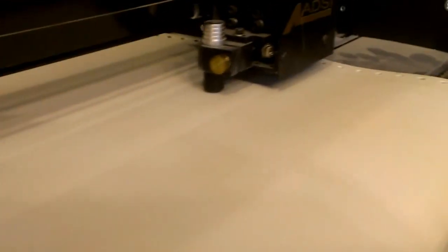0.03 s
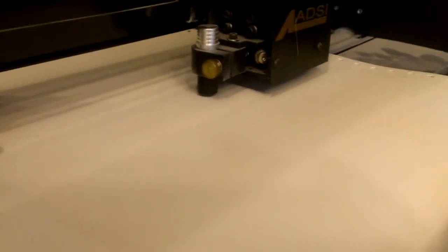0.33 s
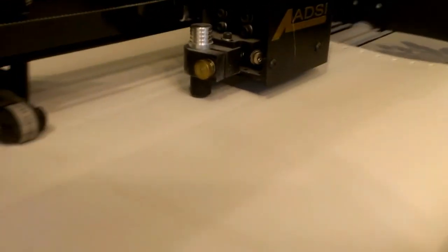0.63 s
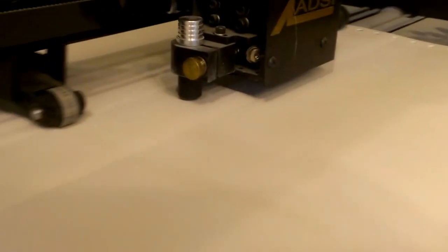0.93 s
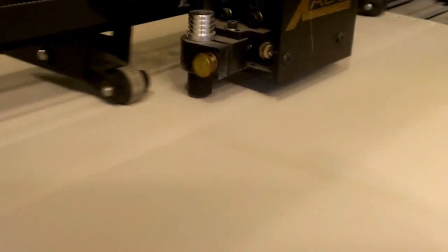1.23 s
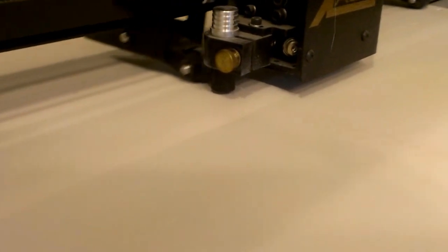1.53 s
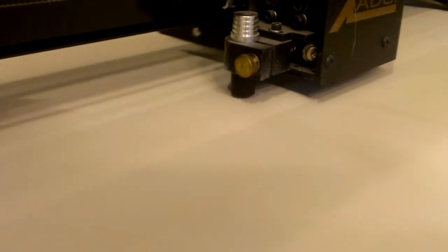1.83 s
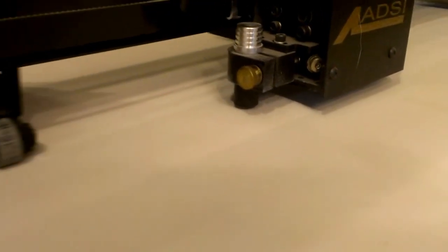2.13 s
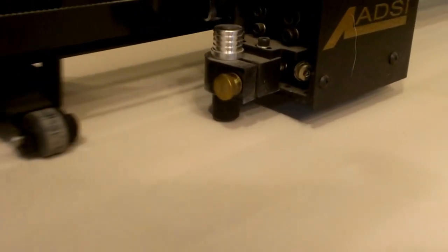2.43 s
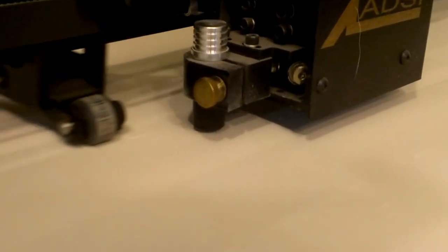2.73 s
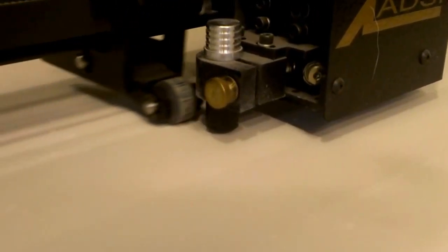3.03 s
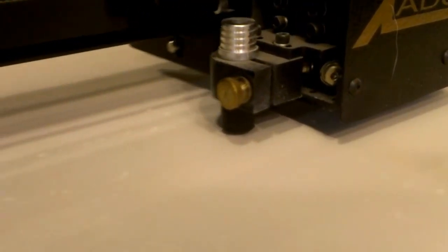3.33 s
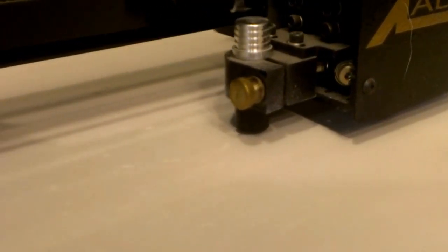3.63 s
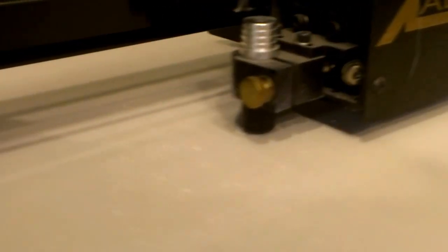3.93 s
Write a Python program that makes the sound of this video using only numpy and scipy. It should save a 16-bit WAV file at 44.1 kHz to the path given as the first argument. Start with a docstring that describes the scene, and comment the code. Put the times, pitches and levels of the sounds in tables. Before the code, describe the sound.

A cutting plotter's motor whirs with high, metallic gear chatter while its blade rasps faintly over a sheet. Rollers knock and grow louder above a low table rumble, until the drive stops with a click, heard close up.

```python
"""Gear teeth chatter in a ringing metal housing as a flatbed cutting plotter drives its gantry closer.
Two thin whines ride on the chatter, and the blade rasps over the sheet in a stream of tiny impacts.
Underneath, table and frame drone, the drive hums in short swells, and rollers knock and sing ever louder.
Near the end the drive brakes with a hum, the head clicks, and a sideways stroke starts with a thin hiss."""
import sys
import numpy as np
from scipy import signal
from scipy.fft import rfft, irfft
from scipy.io import wavfile
from scipy.ndimage import uniform_filter1d, map_coordinates

SR = 44100
rng = np.random.default_rng(int(sys.argv[2]) if len(sys.argv) > 2 else 0)


def inscribe(sig):
    """Save sig as 16-bit PCM at rate SR to the path in sys.argv[1].

    A 1-D sig is mono; a 2-D sig holds one channel per row.
    Samples are clipped to [-1, 1] before scaling.
    """
    pcm = np.round(np.clip(np.atleast_2d(sig).T, -1, 1) * 32767)
    wavfile.write(sys.argv[1], SR, pcm.astype(np.int16))


N = 176400

# tone colour of the table's rumble: f/Hz, relative level/dB
RUMBLE_EQ = [(25, -19), (60, -16.5), (100, -33), (135, -5.5), (200, 3.5), (290, 6.5), (330, -12),
             (420, 2.5), (600, -4), (800, -7), (1080, -14), (1500, -17.5), (2000, -14.5), (2800, -16.5),
             (5000, -39.5)]
# frame resonances: f/Hz, width/Hz, opening level/dB, closing level/dB
FRAME_MODES = [(145.4, 10.4, -58, -39.5), (162.2, 16, -49, -46.5), (245.9, 17, -42, -40.5),
               (261, 18, -40.5, -56.5), (362, 20, -52, -43), (770.7, 8.6, -53, -57.5),
               (822.2, 7, -51.5, -58)]
# the drive hums under load: centre t/s, length/s, f/Hz, level/dB
HUM_SWELLS = [(.015, 0.043, 237, -23), (0.088, 0.05, 249, -26), (0.145, 0.041, 243, -29.5),
              (0.459, 0.099, 257.6, -32), (0.544, 0.036, 255, -26.5), (1.078, 0.09, 266, -29),
              (1.469, 0.14, 251, -32), (2.161, 0.18, 248, -34.5), (3.853, 0.062, 261, -25),
              (3.905, 0.1, 249, -21.5), (3.947, 0.059, 267, -26.5), (3.981, 0.034, 253, -27)]
# roller resonances: f/Hz, width/Hz, base level/dB, pan L-R/dB, multiplier on the ride and surges
ROLLER_MODES = [(747, 90, -44.5, 9, 2.2), (1226, 14, -39.5, 0.5, 1.74), (1309, 44.5, -40.5, 3, 0.97),
                (1368, 52, -41.5, 5, 1.82), (1470, 200, -53, 12, 0.68)]
# level ride of the approaching rollers: t/s, gain/dB
ROLLER_RIDE = [(0, -9.5), (1.6, -10.5), (2, -8.5), (2.6, -7.5), (3.05, -3.5), (3.5, -5), (3.8, -3),
               (4, -9.5)]
# the rollers bind and surge: centre t/s, boost/dB
ROLLER_BINDS = [(2.03, 3), (2.42, 4), (2.93, 3), (3.09, 2.5), (3.31, 3), (3.44, 3), (3.84, 3)]
# rollers knock on the track: t/s, f/Hz, level/dB
TRACK_KNOCKS = [(.737, 370, -28), (.921, 420, -31), (1.823, 466, -26.5), (1.914, 259, -26),
                (2.023, 437, -39), (2.094, 255, -34), (2.647, 263, -27.5), (3.25, 252, -25.5),
                (3.721, 404, -27.5)]
# tone colour of the sideways hiss: f/Hz, relative level/dB
SIDEWAYS_EQ = [(300, 1), (600, 1), (900, 16), (1150, 1), (1350, 1), (2000, -2), (4500, 2.5), (5600, 0),
               (7000, 9.5), (7700, 6), (8600, 10.5), (10500, -2.5), (16000, -11)]
# the head's click and its rebound: t/s, gain/dB
HEAD_CLICKS = [(3.8663, -21.5), (3.871, -27.5)]
# head resonances: f/Hz, t60/s, relative level/dB
HEAD_MODES = [(3080, 0.12, -3.5), (4500, 0.13, -2), (6960, 0.05, -2), (7700, 0.061, 1)]
# tone colour of the blade on the sheet: f/Hz, relative level/dB
RASP_EQ = [(2500, -10), (5000, -1), (8000, 10.5), (10000, 5.5), (12500, -11.5), (16000, -24)]
# tone colour of the faint high hiss above the rasp: f/Hz, relative level/dB
HIGH_HISS_EQ = [(5000, -25), (9000, -15), (12000, 2), (15500, -9)]
# the blade catches: centre t/s, length/s, boost/dB
BLADE_CATCHES = [(0.222, 0.4, 3.5), (.41, 0.065, 8), (0.602, 0.2, 7.5), (.75, 0.12, 6.5), (3.785, 0.094, 4)]
# glide of the lower gear whine: t/s, f/Hz
LOW_WHINE_GLIDE = [(0, 4590), (2.15, 4560), (2.75, 4650), (3.5, 4520), (3.8, 4580)]
# glide of the upper gear whine: t/s, f/Hz
HIGH_WHINE_GLIDE = [(0, 6800), (1, 6560), (1.7, 6700), (3.2, 6760), (3.8, 6650)]
# level ride of the lower whine: t/s, level/dB
LOW_WHINE_RIDE = [(0, -37), (.35, -27.5), (.8, -34.5), (1.4, -31), (2.8, -30), (3.05, -40), (3.45, -32),
                  (3.8, -37)]
# level ride of the upper whine: t/s, level/dB
HIGH_WHINE_RIDE = [(0, -52), (.75, -36), (1.45, -50), (1.88, -38), (2.28, -35.5), (2.48, -53), (2.95, -33),
                   (3.15, -41), (3.35, -37.5), (3.8, -55)]
# the gear cover rings louder as it nears: t/s, level/dB
COVER_RIDE = [(0, -48), (1.5, -49), (3.8, -34.5)]
# one hard clack of the teeth: t/s, added load relative to the steady chatter/dB
TOOTH_CLACKS = [(1.193, 1)]
# ring of the gear housing: f/Hz, relative level/dB
HOUSING_EQ = [(1500, -44.5), (2800, -55), (2950, -22.5), (3350, -21.5), (3490, -36), (3590, -14),
              (3900, -7.5), (4230, -9), (4420, -1), (4570, 0.5), (4740, -1), (4900, -9), (5230, -19),
              (5700, -20.5), (6030, -10.5), (6400, -13.5), (6720, -9), (6920, -19), (7270, -17),
              (8300, -25.5), (9200, -33.5), (9580, -20), (10300, -62), (11000, -27), (12500, -51),
              (16000, -69)]
# the housing's ring leans left in the top end: f/Hz, pan L-R/dB
HOUSING_BALANCE = [(3000, 2), (3900, 2), (4550, -5), (5400, -3), (5950, 4.5), (6700, 9.5), (7600, 5.5),
                   (9600, 5.5), (15000, 14)]
# level ride of the housing's ring: t/s, gain/dB
HOUSING_RIDE = [(0, -1), (2.6, -0.14), (3.8, -0.5)]
# stereo drift of the housing's ring and the lower whine: t/s, pan L-R/dB
GEAR_PAN = [(0, .5), (.8, 1.2), (1.6, 2), (2.25, 3.5), (2.7, 1.8), (3.4, 0), (3.8, 2)]

START_S, RUN_UP_S, BRAKE_S, STOP_S = -0.029, 0.072, 3.815, 3.882  # the gantry's stroke
RUMBLE_START_DB, RUMBLE_RISE_DB = -40.58, 1.04
KNOCK_ATTACK_S, KNOCK_T60_S, CLICK_ATTACK_S = 0.011, 0.14, 0.002
SIDEWAYS_START_S, SIDEWAYS_ATTACK_S, SIDEWAYS_DB = 3.85, 0.13, -33.5
BLADE_BASE_DB, BLADE_RISE_DB, HISS_OFFSET_DB = -45.5, 4, -10
SHAFT_HZ, BIND_DEPTH, BIND_DECAY_TURNS, HOUSING_BASE_DB = 21.57, 0.3, 0.65, -25.5
HIGH_CUT_HZ = 15750
TIME = np.arange(N) / SR
PROGRESS = np.arange(N) / N


def undb(db):
    """Decibels to gain."""
    return 10 ** (np.asarray(db) / 20)


def unit(x):
    """Scale to an rms of one."""
    return x / np.sqrt(np.mean(x ** 2))


def curve(rows):
    """An automation line through (t/s, value) rows."""
    return np.interp(TIME, *np.array(rows).T)


def swell(at, length):
    """A smooth rise and fall around a moment."""
    return np.cos(np.pi * np.clip((TIME - at) / length, -.5, .5)) ** 2


def decay(at, t60):
    """A hard attack and an exponential tail."""
    age = TIME - at
    return (age >= 0) * undb(-60 * np.maximum(age, 0) / t60)


def drift(rate):
    """Smooth random modulation at unit rms, with about `rate` new values a second."""
    hold = int(SR / rate)
    steps = rng.standard_normal(N)[np.arange(N) // hold]
    return unit(uniform_filter1d(uniform_filter1d(steps, hold), hold))


def by_hz(rows):
    """Read (f/Hz, value) rows at every FFT bin, on a log frequency scale."""
    hz, value = np.array(rows).T
    return np.interp(np.log(np.arange(N // 2 + 1) * SR / N + 1), np.log(hz), value)


def body(x, eq):
    """Ring a body with the given tone colour: a minimum-phase filter, output at unit rms."""
    cepstrum = irfft(np.log(undb(by_hz(eq))), N)
    cepstrum[1:N // 2] *= 2
    cepstrum[N // 2 + 1:] = 0
    return unit(irfft(rfft(x) * np.exp(rfft(cepstrum)), N))


def resonate(x, hz, width):
    """A resonance with steep skirts, output at unit rms."""
    f = np.arange(N // 2 + 1) * SR / N + 1e-3
    return unit(irfft(rfft(x) / (1 + .5j * hz / width * (f / hz - hz / f)) ** 2, N))


def pan(db):
    """Left and right gains for an L-R level difference."""
    return undb(np.array([db, -db]).reshape(2, -1) / 2)


def spread(pair, side):
    """Turn a mid/side pair into left and right."""
    return pair[0] + side * pair[1] * np.array([[1], [-1]])


def noise(side):
    """Stereo noise of a given width."""
    return spread(rng.standard_normal((2, N)), side)


def ticks(rate, scatter_db, side):
    """A stereo stream of tiny impacts of uneven strength, `rate` a second in both mid and side."""
    strength = undb(scatter_db * np.clip(rng.standard_normal((2, N)), -2, 2))
    hits = rng.random((2, N)) < rate / SR
    polarity = np.sign(rng.standard_normal((2, N)))
    return spread(unit(hits * strength * polarity), side)


def beam(x):
    """The metal beam adds a short dense ring, different on each side."""
    tail = rng.standard_normal((2, N)) * decay(0, t60=0.078)
    tail /= np.sqrt(np.sum(tail ** 2, axis=1, keepdims=True))
    return unit(x + undb(-0.5) * irfft(rfft(x) * rfft(tail), N))


def gantry_speed():
    """The gantry runs up, cruises at one and brakes to zero."""
    run_up = np.clip((TIME - START_S) / RUN_UP_S, 0, 1)
    return run_up * np.clip((STOP_S - TIME) / (STOP_S - BRAKE_S), 0, 1)


def frame_drone():
    """The low bed: the gantry shakes table and frame, and their balance shifts along the way."""
    shake = rng.standard_normal((2, N))
    side_eq = [(60, 4), (150, -3), (300, -13), (600, -5.5), (1500, -3.5)]  # f/Hz, gain/dB
    shake[1] = irfft(rfft(shake[1]) * undb(by_hz(side_eq)), N)
    out = body(spread(shake, side=0.7), RUMBLE_EQ) * undb(RUMBLE_START_DB + RUMBLE_RISE_DB * PROGRESS)
    for hz, width, first_db, last_db in FRAME_MODES:
        mode = resonate(noise(side=min(hz / 1800, 1)), hz, width)
        out += mode * undb(first_db + (last_db - first_db) * PROGRESS)
    return out


def drive_hum():
    """The loaded drive gives short swells of low, slightly unsteady hum."""
    wobble = .3 * drift(50)
    out = np.zeros(N)
    for at, length, hz, db in HUM_SWELLS:
        tone = np.sqrt(2) * np.sin(2 * np.pi * hz * (TIME - at) + wobble)
        out += undb(db) * swell(at, length) * tone
    return out


def roller_song():
    """Rollers sing on their track as they near, wavering in pitch and surging where they bind."""
    ride_db = curve(ROLLER_RIDE) + sum(db * swell(at, length=.1) for at, db in ROLLER_BINDS)
    song = sum(resonate(noise(side=0.7), hz, width) * undb(db + follow * ride_db) * pan(pan_db)
               for hz, width, db, pan_db, follow in ROLLER_MODES)
    varispeed = np.cumsum(1 + .004 * drift(12))
    return np.array([map_coordinates(channel, [varispeed], mode="mirror") for channel in song])


def roller_knocks():
    """Rollers bump over the track: each soft push rings the table briefly, each spot at its own pitch."""
    out = np.zeros((2, N))
    for at, hz, db in TRACK_KNOCKS:
        push = np.clip((TIME - at) / KNOCK_ATTACK_S, 0, 1) * decay(at, KNOCK_T60_S)
        tone = np.sin(2 * np.pi * hz * (TIME - at))
        thud = resonate(noise(side=0.21), hz, width=360)
        out += undb(db) * push * (tone + .5 * thud)
    return signal.sosfilt(signal.butter(6, 170, "highpass", fs=SR, output="sos"), out)


def sideways_hiss():
    """The carriage sets off sideways: dense ticks fade in as a thin hiss."""
    fade_in = np.clip((TIME - SIDEWAYS_START_S) / SIDEWAYS_ATTACK_S, 0, 1)
    hiss = body(ticks(rate=7800, scatter_db=2, side=0.66), SIDEWAYS_EQ)
    return hiss * fade_in * undb(SIDEWAYS_DB) * pan(db=3)


def head_click():
    """The head snaps over and rebounds: a short crack and a few broad, rattling resonances."""
    out = np.zeros((2, N))
    for at, db in HEAD_CLICKS:
        rattle = noise(side=0.47)
        ring = sum(undb(mode_db) * decay(at, t60) * resonate(rattle, hz, width=500)
                   for hz, t60, mode_db in HEAD_MODES)
        crack = decay(at, t60=0.053) * body(rattle, RASP_EQ)
        attack = np.clip((TIME - at) / CLICK_ATTACK_S, 0, 1)
        out += undb(db) * attack * (0.5 * ring + 0.31 * crack)
    return out * pan(db=4.5)


def blade_rasp():
    """The blade scratches the sheet, louder and brighter where it catches.
    A faint high hiss wavers randomly in level above it."""
    catch_db = sum(db * swell(at, length) for at, length, db in BLADE_CATCHES)
    ride_db = BLADE_BASE_DB + BLADE_RISE_DB * (PROGRESS - .5) + 0.63 * drift(19) + catch_db
    rasp = body(beam(ticks(rate=5300, scatter_db=0.5, side=0.26)), RASP_EQ)
    hiss = body(ticks(rate=4900, scatter_db=-4, side=0.97), HIGH_HISS_EQ)
    hiss_waver_db = np.tanh(drift(22))
    hiss *= undb(HISS_OFFSET_DB + .4 * catch_db + hiss_waver_db)
    return (rasp + hiss) * undb(ride_db) * gantry_speed() * pan(db=5)


def gear_whine(glide, jitter_hz, side):
    """A meshing tone roughened by fast pitch jitter and slower wander, partly different on each side."""
    mid_side_hz = [curve(glide) + jitter_hz * drift(400) + 22 * drift(30) for _ in range(2)]
    tones = [np.sin(2 * np.pi * np.cumsum(hz) / SR) for hz in mid_side_hz]
    return unit(spread(tones, side))


def tooth_load():
    """The teeth bind once in every shaft turn, then ease off; one hard clack stands out."""
    turns = np.cumsum(SHAFT_HZ * (1 + .025 * drift(2.7))) / SR
    bind = np.exp(-(turns % 1) / BIND_DECAY_TURNS) * (1 + .5 * np.tanh(drift(21.8)))
    clack = sum(undb(db) * decay(at, t60=0.016) for at, db in TOOTH_CLACKS)
    return unit(1 + BIND_DEPTH * bind + clack)


def gear_chatter():
    """The lead: tooth impacts ring the housing; its cover and two whines pulse with the same load."""
    load = tooth_load()
    impacts = ticks(rate=9000, scatter_db=1.2, side=0.12) * load
    housing = body(beam(impacts), HOUSING_EQ)
    housing = unit(irfft(rfft(housing) * pan(by_hz(HOUSING_BALANCE)), N))
    housing *= undb(HOUSING_BASE_DB + curve(HOUSING_RIDE))
    cover = resonate(noise(side=1) * load, hz=4057, width=222)
    cover *= undb(curve(COVER_RIDE)) * pan(db=6.5)
    low_whine = gear_whine(LOW_WHINE_GLIDE, jitter_hz=31, side=0.31)
    low_whine *= load * undb(curve(LOW_WHINE_RIDE)) * pan(db=2.5)
    high_whine = gear_whine(HIGH_WHINE_GLIDE, jitter_hz=40, side=1)
    high_whine *= load * undb(curve(HIGH_WHINE_RIDE)) * pan(db=9.5)
    whir = (housing + low_whine) * pan(curve(GEAR_PAN))
    return (whir + cover + high_whine) * gantry_speed()


def scene():
    """Gears up front, the low bed beneath, and the cutting head's detail on top."""
    gears = gear_chatter()
    bed = frame_drone() + roller_song() + roller_knocks() + drive_hum()
    return gears + bed + blade_rasp() + head_click() + sideways_hiss()


def record(dry):
    """A steep high cut on the whole mix."""
    return signal.sosfilt(signal.ellip(10, .1, 90, HIGH_CUT_HZ, fs=SR, output="sos"), dry)


dry = scene()
out = record(dry)
inscribe(out)
```